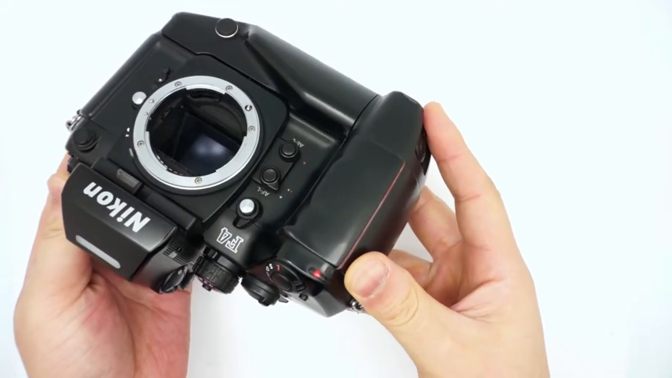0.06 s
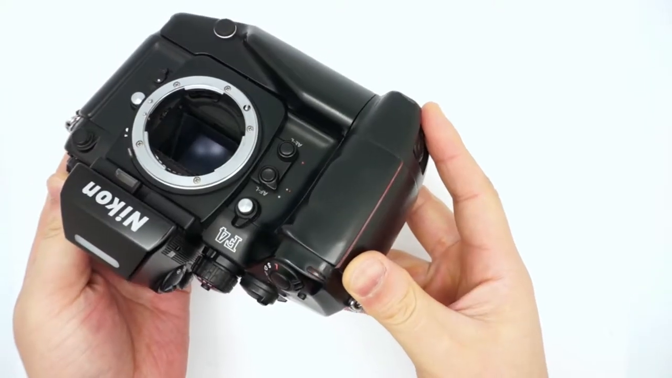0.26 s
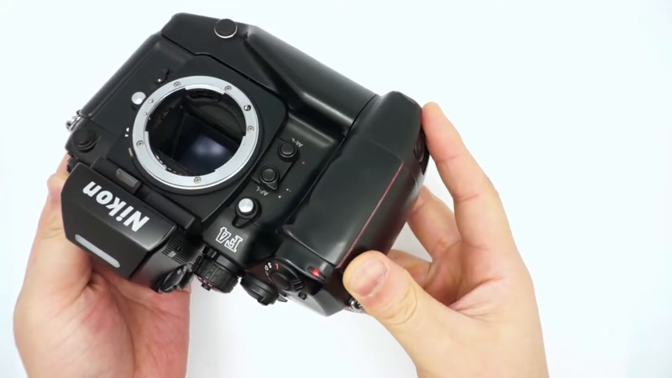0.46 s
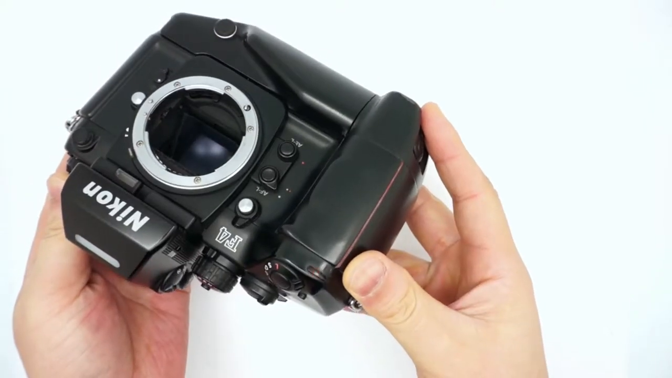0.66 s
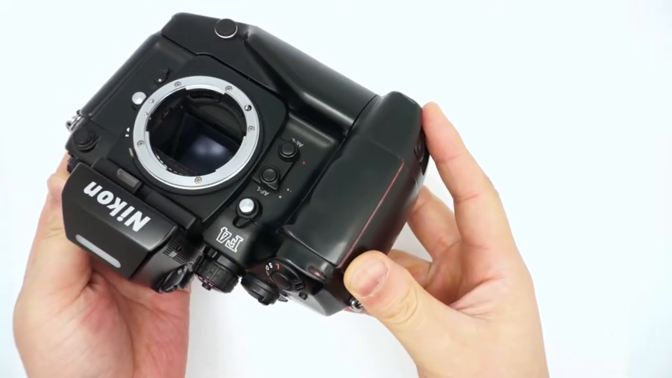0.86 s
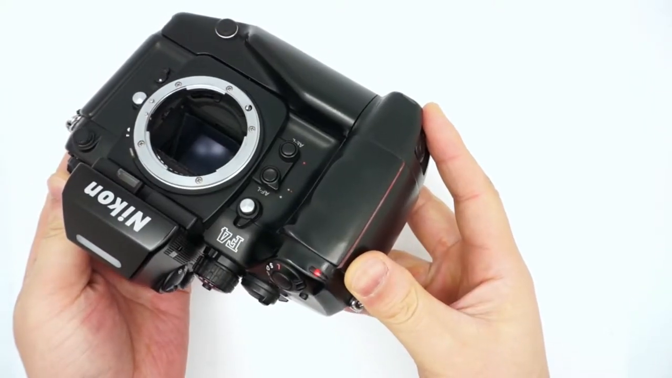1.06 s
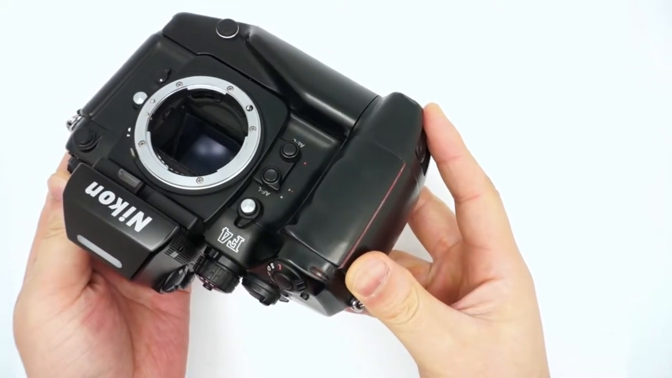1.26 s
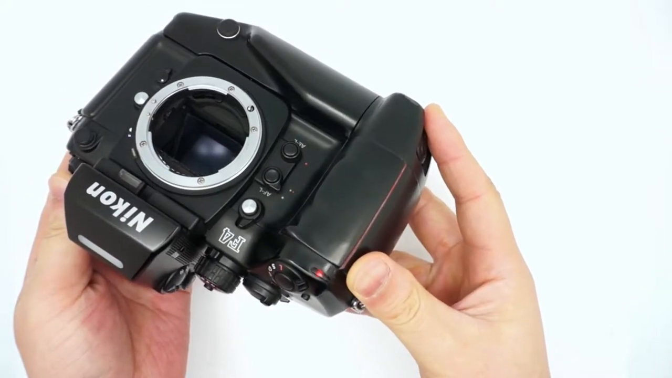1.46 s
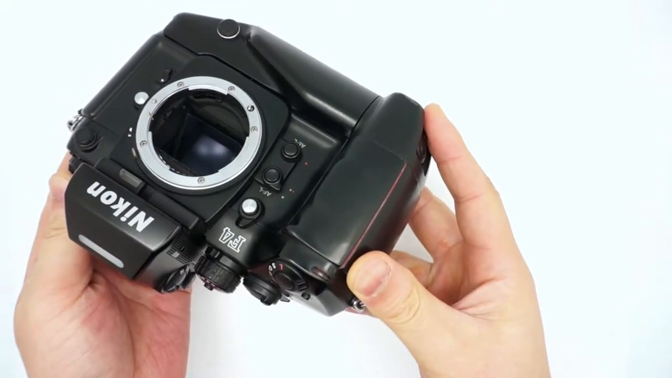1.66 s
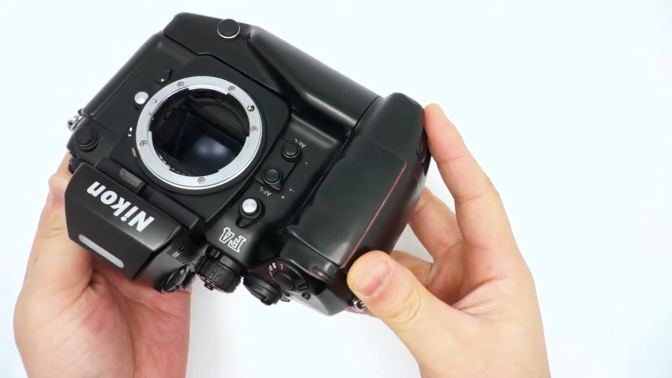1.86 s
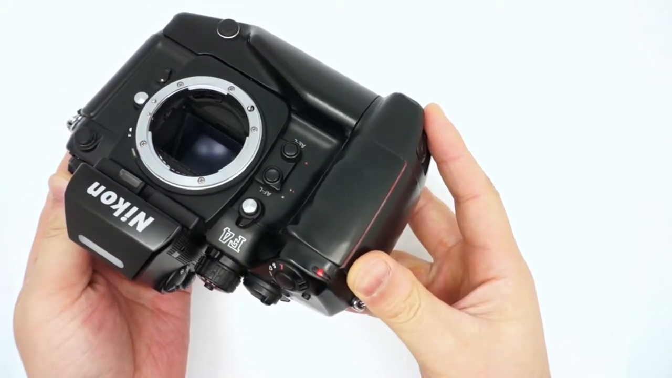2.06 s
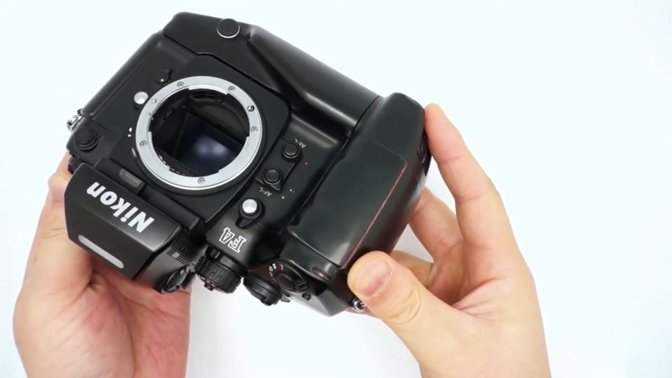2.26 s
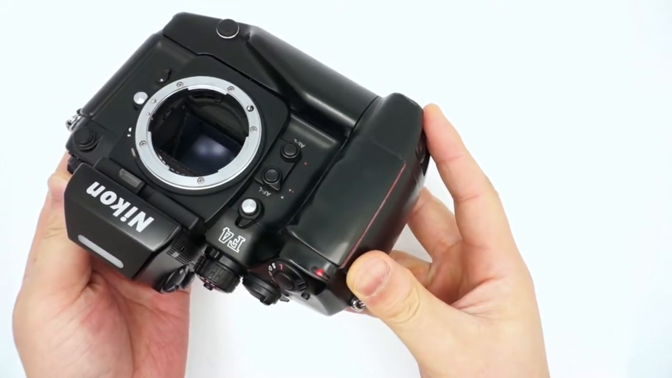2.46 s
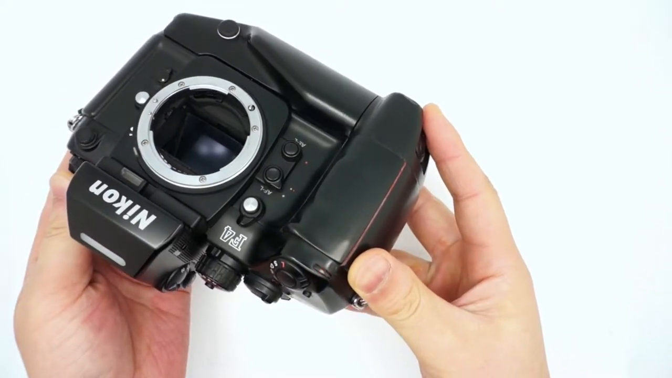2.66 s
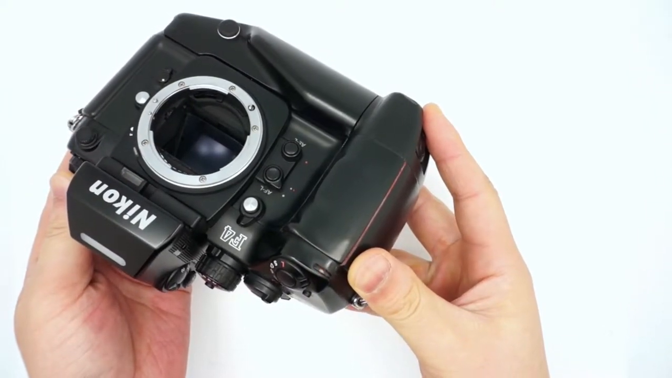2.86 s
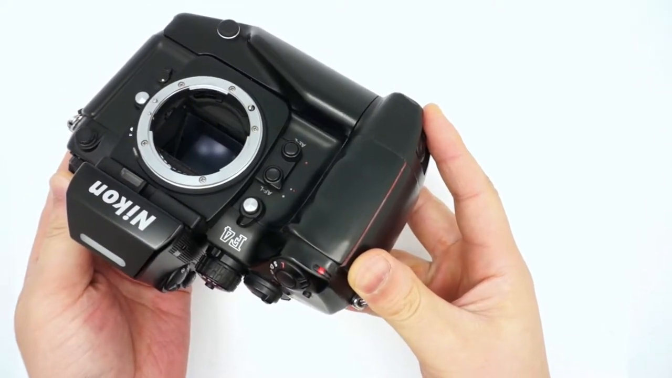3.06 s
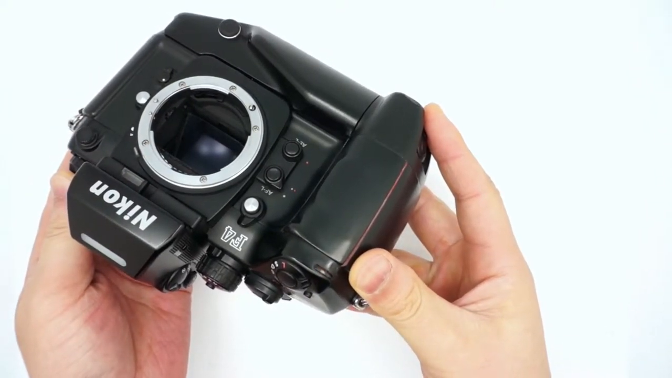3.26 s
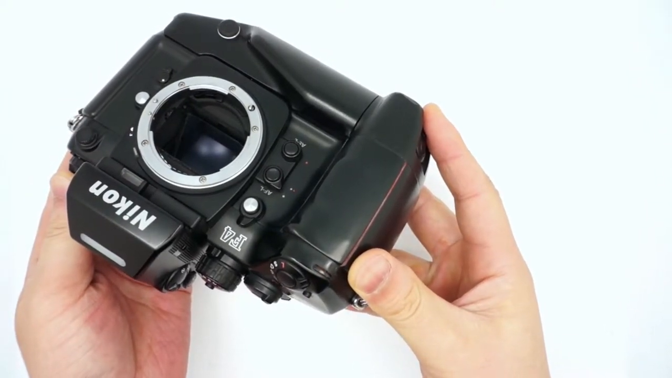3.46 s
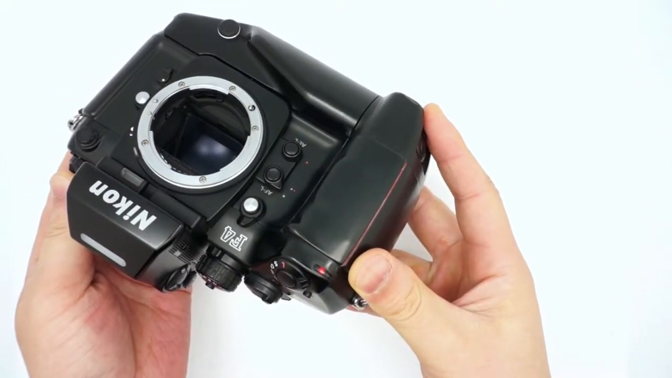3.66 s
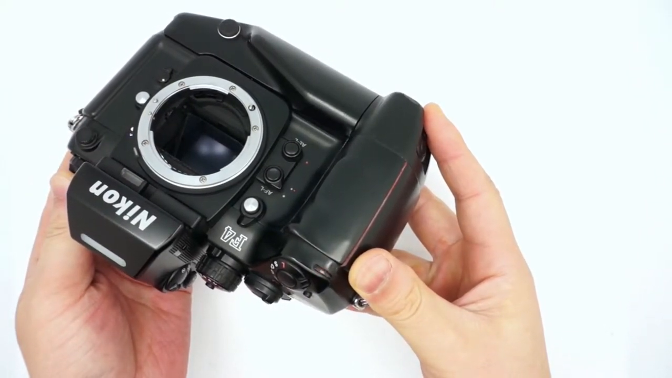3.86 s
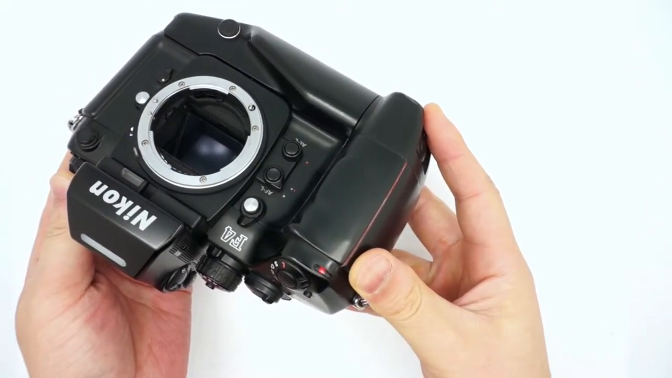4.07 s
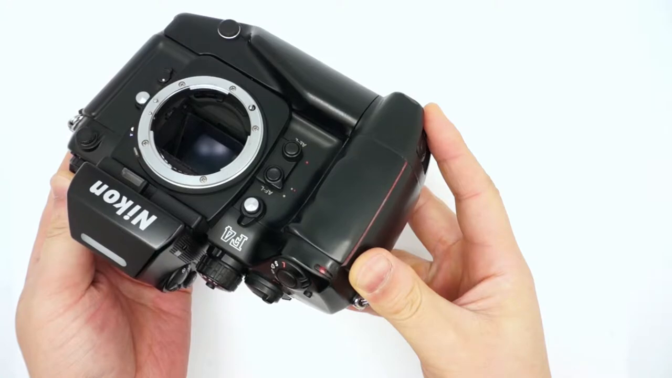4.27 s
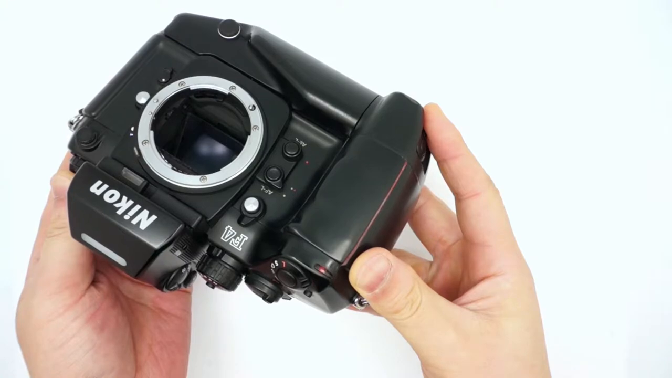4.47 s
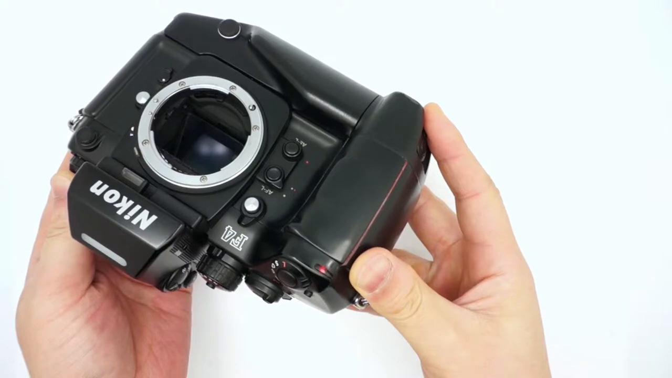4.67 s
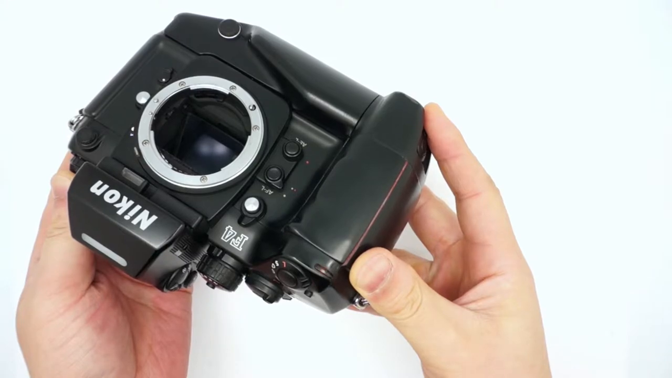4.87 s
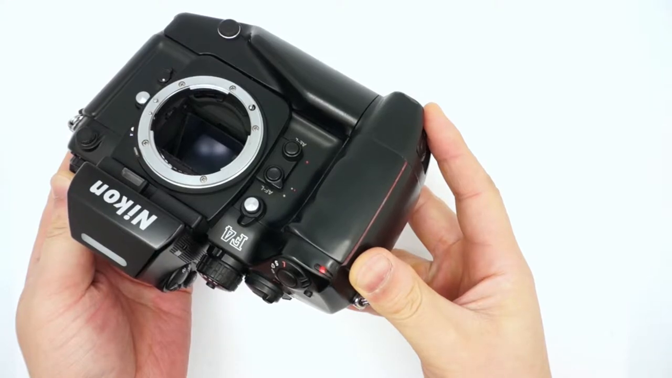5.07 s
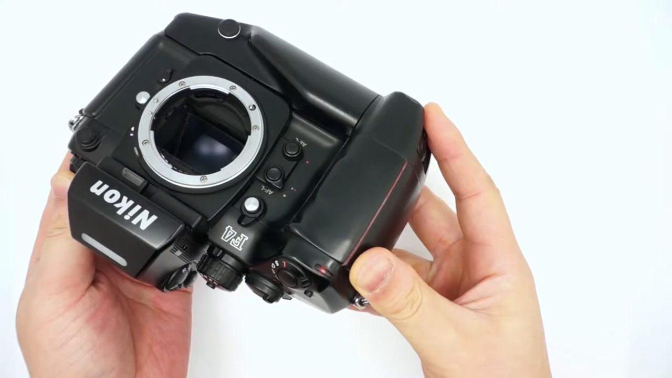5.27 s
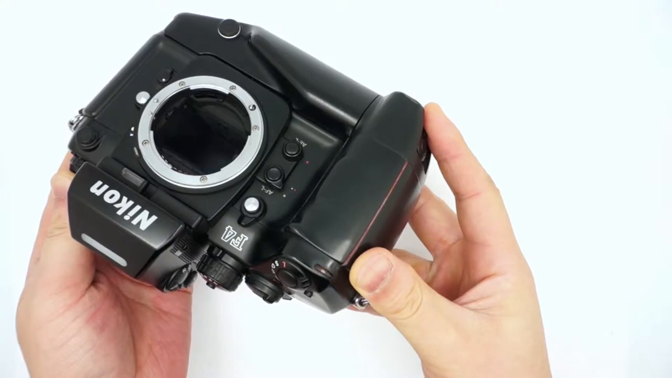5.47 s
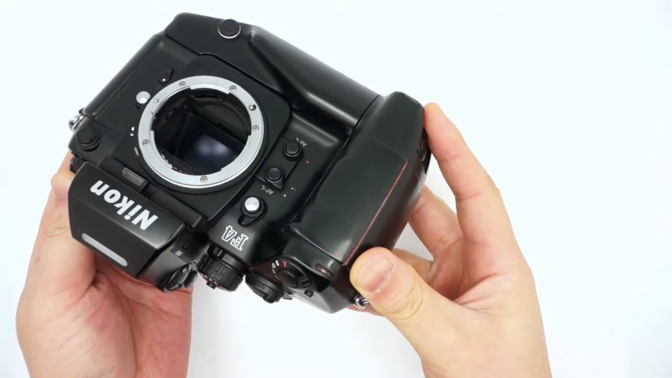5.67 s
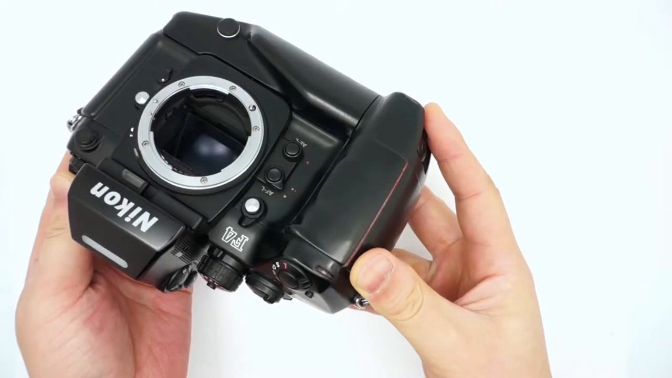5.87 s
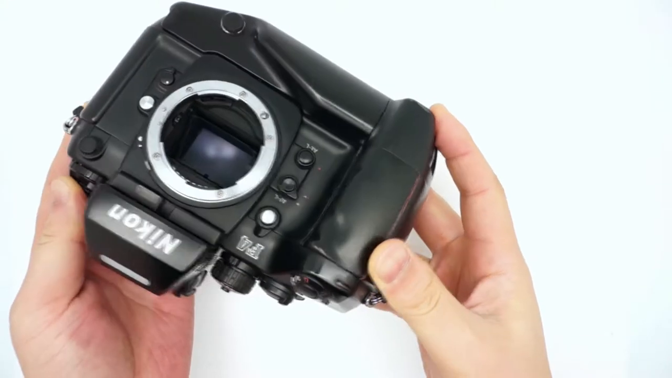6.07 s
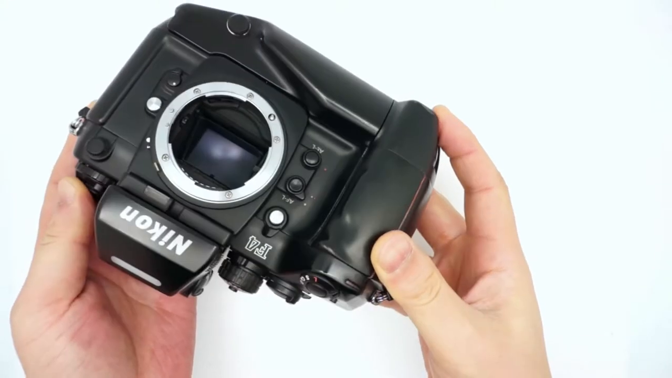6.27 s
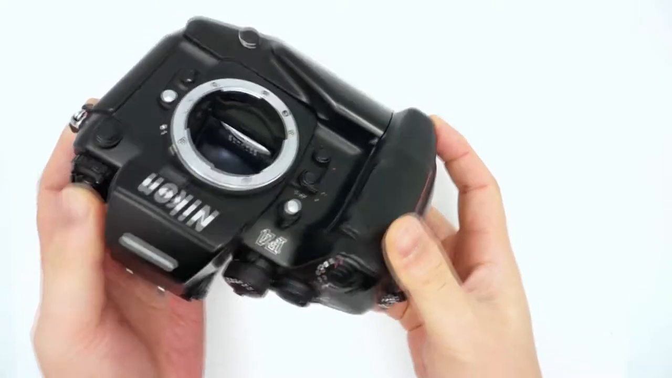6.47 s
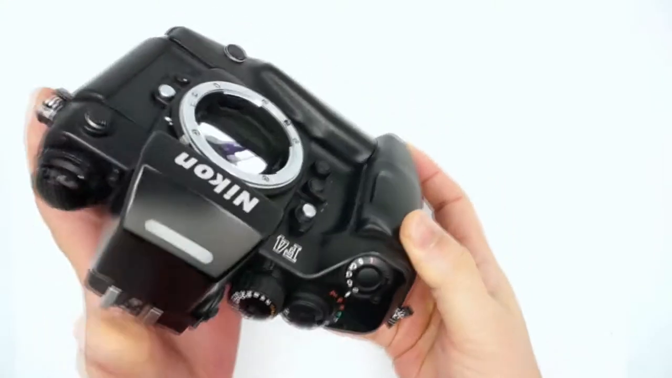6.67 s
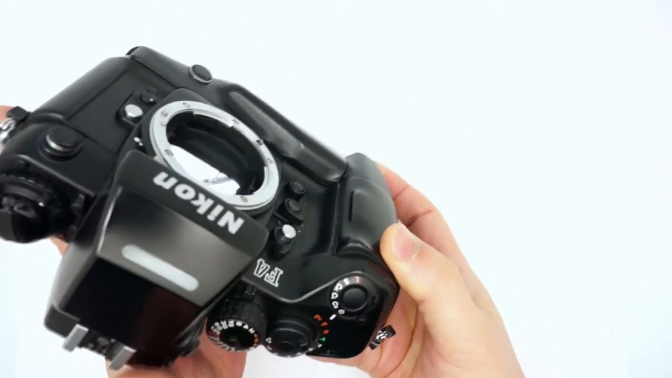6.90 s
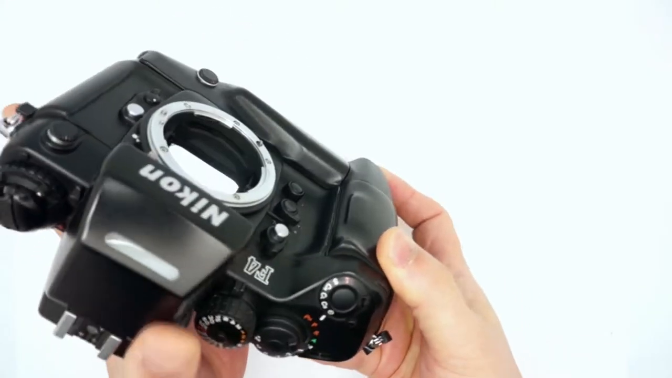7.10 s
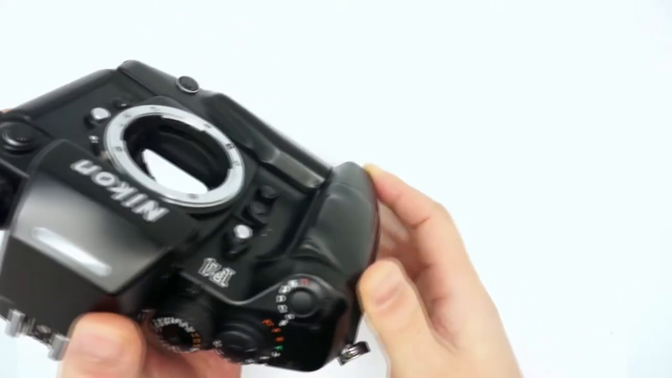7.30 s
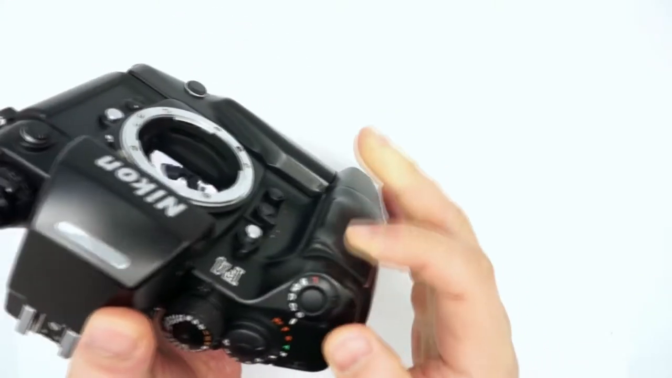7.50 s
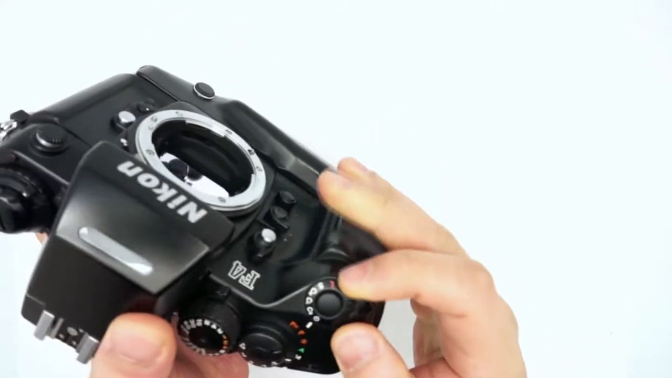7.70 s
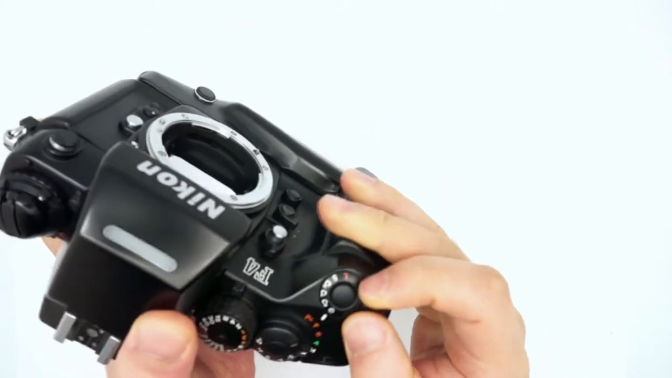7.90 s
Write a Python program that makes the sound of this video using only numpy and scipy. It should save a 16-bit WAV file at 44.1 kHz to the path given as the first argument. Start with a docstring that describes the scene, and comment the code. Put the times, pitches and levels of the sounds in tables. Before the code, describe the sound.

Over a steady fan hum, a film camera's shutter snaps once with a winding rasp, followed by finger taps and a table thump.

```python
"""A fan hums in a small room, and hands rustle faintly on a film camera held close to the microphone.
At 5.5 s the motor-driven camera fires once: mirror up, shutter, winding motor, mirror down.
Its levers strike their stops, its gears rasp, and the case and springs ring. Then the hands turn it
over, fingers tap, strap lugs click, and it is set down on a table with a thump. The fan runs
throughout; the recorder's gain control ducks at the loud blows and creeps back."""
import sys
import numpy as np
from scipy import signal
from scipy.fft import rfft, irfft, next_fast_len
from scipy.io import wavfile
from scipy.ndimage import uniform_filter1d, map_coordinates

SR = 44100
rng = np.random.default_rng(int(sys.argv[2]) if len(sys.argv) > 2 else 0)


def materialize(psi):
    """Save the field psi as 16-bit PCM at rate SR to the path in sys.argv[1].

    A 1-D psi becomes a single channel; in a 2-D psi each row is a channel.
    """
    bounded = np.clip(np.atleast_2d(psi).T, -1, 1)
    quanta = np.round(bounded * 32767).astype(np.int16)
    wavfile.write(sys.argv[1], SR, quanta)


N = 350154
TIME = np.arange(N) / SR
AGE = np.arange(SR) / SR  # seconds since a blow

# modes of the camera's hollow case: pitch_hz, level_db, t60_s
CASE_MODES = [(638, -4.5, 0.087), (730, -8, 0.084), (878, -33.5, 0.077), (1020, -12.5, 0.07),
              (1300, -14.5, 0.23), (1462, -12, 0.059), (1610, -3, 0.06), (1760, -9, 0.056)]
# modes of the metal works inside it: pitch_hz, level_db, t60_s
WORKS_MODES = [(2400, -10, .06), (2833, -8, .055), (3018, -7, .06), (5182, -13, .045), (6083, -13, .045),
               (6762, -14, .045), (9316, -16, .04)]


def shutter_release(catch_delay_s=0.0048, chatter_s=0.0026):
    """Mirror and shutter levers hit their stops in turn, each followed by its catch dropping in."""
    # start_s, click_db, corner_hz, ring_over_click_db, lever_hz, catch_over_lever_db, catch_hz
    levers = [(5.5163, 3.5, 19000, -2, 6530, -7, 5380), (5.552, -9, 9000, 4, 382, -7.5, 3460),
              (5.5703, 3, 12100, 1, 5310, 1, 7500), (5.5824, -0.5, 8600, 6, 4470, -10, 5160),
              (5.6170, -6.5, 7500, 4, 3050, -1.5, 2990), (5.6351, 6.5, 13100, 5, 6960, -3.5, 2950),
              (5.6572, 1, 8060, 3.5, 5780, -5, 3020), (5.6935, -5, 9500, -5, 1110, -8, 1130),
              (5.7040, 6, 9800, 0, 1197, 0.5, 1626)]
    modes = CASE_MODES + WORKS_MODES
    track = np.zeros(N)
    for start_s, lever_db, corner_hz, ring_db, lever_hz, catch_db, catch_hz in levers:
        case_db = -2.5 - 10 * np.log2(corner_hz / 9000)  # brighter clicks shake the case less
        lever = (start_s, lever_db, lever_hz)
        catch = (start_s + catch_delay_s, lever_db + catch_db, catch_hz)
        for s, db, hz in (lever, catch):
            t60 = 0.035 * np.exp(-0.14 * db)  # harder blows pin the part to its stop
            add(track, s, strike(modes, db, chatter_s, corner_hz, db + case_db, hz, db + ring_db, t60))
    return track


def strike(modes, click_db, rattle_s, corner_hz, case_db, part_hz, part_db, part_t60, looseness=0.0015):
    """A part hits its stop, chatters for a moment and rings; the case rings with it."""
    # spectrum of a metal click: frequency_hz, level_db
    steel = [(150, -24), (500, -8), (1500, -1), (2100, -4), (3000, -2), (5700, 1), (7600, -1), (9500, 0),
             (12000, -2), (15500, -4)]

    def fade(t60):
        return (1 - np.exp(-AGE / 0.00027)) * amp(-60 * np.maximum(AGE - rattle_s, 0) / t60)
    click = unit(noise(lambda hz: amp(along(steel, hz)) / np.hypot(1, (hz / corner_hz) ** 2), size=SR))
    # a dry crack, then the weaker shimmer of many small parts
    click *= np.hypot(fade(0.05), amp(-9) * fade(0.07))
    # a loose, quickly damped part has a blurred pitch
    drift = np.cumsum(rng.standard_normal(SR)) * np.sqrt(2 * np.pi * looseness * part_hz / part_t60 / SR)
    part = np.sqrt(2) * np.sin(2 * np.pi * part_hz * AGE + drift)
    case = ring(modes, attack_s=0.00042, scatter_db=4)
    return amp(click_db) * click + amp(part_db) * part * fade(part_t60) + amp(case_db) * case


def ring(modes, attack_s, scatter_db):
    """Damped modes, with new strengths and phases at every blow."""
    sound = np.zeros(SR)
    for hz, db, t60 in modes:
        decay = amp(db + scatter_db * rng.normal() - 60 * AGE / t60)
        sound += decay * np.sin(2 * np.pi * (hz * AGE + rng.random()))
    return sound * (1 - np.exp(-AGE / attack_s))


def mirror_springs(start_s=5.7045):
    """The falling mirror leaves its springs singing."""
    # modes of the springs: pitch_hz, level_db, t60_s
    spring_modes = [(1234, -17, .75), (1335, -28, 2.0), (1572, -12, .33), (2180, -26, .4), (2606, -28, .3),
                    (8113, -36, .3)]
    track = np.zeros(N)
    add(track, start_s, amp(1) * ring(spring_modes, attack_s=0.003, scatter_db=1))
    return track


def winding_motor(on_s=5.5135, off_s=5.708, spin_up_s=0.004, tooth_hz=370):
    """Gears rasp tooth by tooth through case and works, louder as the motor tensions the springs."""
    # spectrum of the rasp: frequency_hz, level_db
    gears = [(200, -26), (650, -4), (1600, -2), (2100, -3), (3000, 0), (4000, -1), (5800, 1), (9000, -3),
             (15500, -8)]
    load_db_per_s, brake_db_per_s = 47, 797

    def body(hz):
        modes = CASE_MODES + WORKS_MODES
        return 1 + sum(amp(db + 14) * peak(hz, centre, 35) ** 2 for centre, db, _ in modes)
    teeth_passed = np.cumsum(tooth_hz * (1 + 0.08 * wobble(40))) / SR
    teeth = unit(np.exp(0.44 * np.cos(2 * np.pi * teeth_passed)))
    running_s = np.clip(TIME, on_s, off_s) - on_s
    level_db = -10 + load_db_per_s * running_s - brake_db_per_s * np.maximum(TIME - off_s, 0)
    effort = amp(level_db) * (1 - np.exp(-running_s / spin_up_s))
    rasp = unit(noise(lambda hz: amp(along(gears, hz)) * body(hz)))
    return effort * teeth * rasp


def set_down():
    """The padded base thumps on the table top, and the camera clatters."""
    # modes of the table top: pitch_hz, relative_db, t60_s
    table_modes = [(84, -3, .13), (112, -1, .12), (175, -12, .06), (290, -9, .06), (377, -9, .09),
                   (720, -19, .05), (1109, -30, .07)]
    # edge, base, rattle, settling: start_s, click_db, rattle_s, corner_hz, ring_hz
    landing = [(7.4127, -18.5, 0.0041, 6700, 3910), (7.4195, -15, 0.0026, 3500, 655),
               (7.4300, -23.5, 0.017, 3570, 1110), (7.457, -28.5, 0.0027, 5000, 2420)]
    track = np.zeros(N)
    add(track, 7.414, amp(14) * ring(table_modes, attack_s=0.011, scatter_db=0.7))
    for s, db, rattle_s, corner_hz, hz in landing:
        add(track, s, strike(CASE_MODES, db, rattle_s, corner_hz, case_db=db,
                             part_hz=hz, part_db=db - 4, part_t60=0.063))
    return track


def finger_taps():
    """Fingers knock on the hollow case and its dials with a small click."""
    # start_s, click_db, knock_db, ring_hz
    taps = [(6.4819, -32.5, -30.5, 1560), (6.5258, -39, -21.5, 610), (6.5968, -33, -25, 610),
            (6.9370, -21, -14, 1030), (7.1634, -39, -39, 706), (7.2656, -35.5, -23.5, 684),
            (7.2880, -39, -33, 1600), (7.348, -40, -32, 680)]
    track = np.zeros(N)
    for s, click_db, knock_db, hz in taps:
        add(track, s, strike(CASE_MODES, click_db, rattle_s=0.003, corner_hz=9300, case_db=knock_db - 0.5,
                             part_hz=hz, part_db=knock_db - 1, part_t60=0.045))
    return track


def strap_lugs():
    """Light steel lugs click brightly and hardly move the case."""
    # start_s, click_db, ring_over_click_db, ring_hz
    clicks = [(6.7573, -20, -4, 6420), (6.8388, -20.5, -5, 4390)]
    track = np.zeros(N)
    for s, db, ring_db, hz in clicks:
        add(track, s, strike(CASE_MODES, db, rattle_s=0.0054, corner_hz=17000, case_db=db - 19,
                             part_hz=hz, part_db=db + ring_db, part_t60=0.06))
    return track


def hands():
    """Skin slides over the grip with a fine hiss, or shifts with a dull rustle."""
    # strokes along the grip: peak_s, half_length_s, level_db
    slides = [(2.608, 0.15, -33), (2.89, 0.13, -42.5), (6.135, 0.11, -33), (6.55, 0.087, -35),
              (6.845, 0.063, -34.5), (7.366, 0.085, -37.5), (7.94, 0.051, -40)]
    # spectrum of sliding skin: frequency_hz, level_db
    skin = [(300, -5), (1300, 11.5), (2200, 9), (5500, 7.5), (9000, 6.5), (15500, 6)]
    # rustles of the hands: peak_s, rise_s, level_db, centre_hz
    shifts = [(.265, 0.03, -40, 890), (2.27, 0.039, -40.5, 2100), (4.26, 0.02, -35.5, 750),
              (6.27, 0.022, -39, 900), (6.82, 0.025, -35, 3980)]

    def swell(s, rise_s, fall_s):
        return np.exp(-((TIME - s) / np.where(TIME < s, rise_s, fall_s)) ** 2)
    pressure = sum(amp(db) * swell(s, half_s, half_s) for s, half_s, db in slides)
    track = pressure * unit(noise(lambda hz: amp(along(skin, hz))))
    for s, rise_s, db, centre_hz in shifts:
        rustle = unit(noise(lambda hz: peak(hz, centre_hz, width_hz=1100) ** 2))
        track += amp(db) * swell(s, rise_s, fall_s=2.1 * rise_s) * rustle
    return track


def fan(blade_hz=193.9, hum_db=-20.5, sag_db_per_s=0.32):
    """Mid and side of a slowly fading blade tone in resonant air noise, over the microphone's hiss."""
    # rush of the air: frequency_hz, density_db
    rush = [(18, -54), (40, -52.5), (90, -49), (150, -43.5), (205, -56), (250, -51), (300, -64), (400, -61),
            (520, -72.5), (700, -72), (1100, -72.5), (1800, -83.5), (4000, -88), (15000, -115)]
    # resonances of fan and room: centre_hz, half_width_hz, density_db
    resonances = [(43.3, 2.9, -45), (61, 1.46, -39), (164.5, 9.8, -42), (382.2, 25.7, -54.5),
                  (631.6, 24, -66), (5460, 75, -80)]
    # the microphone's own noise: frequency_hz, density_db
    hiss = [(500, -83), (4000, -86), (13800, -84), (14900, -82.5), (15800, -80)]
    # stereo width of the noise: frequency_hz, side_over_mid_db
    spread = [(60, -30.5), (110, -39.5), (200, -16), (380, -10.5), (700, -5.5), (1290, -1.5), (2380, -4),
              (4400, -19.5), (8120, -79), (15000, -33)]

    def air(hz):
        boom_power = sum((amp(db) * peak(hz, centre, 2 * half) ** 2) ** 2
                         for centre, half, db in resonances)
        return np.sqrt(amp(along(rush, hz)) ** 2 + boom_power + amp(along(hiss, hz)) ** 2)
    tone = np.sqrt(2) * np.sin(2 * np.pi * blade_hz * TIME + 0.14 * wobble(1.6))
    hum = amp(hum_db - sag_db_per_s * TIME + 0.67 * wobble(4.02)) * tone
    # a narrow band of the rush swells once, at 1.6 s, and stays
    swell = (1 + np.tanh((TIME - 1.6) / 0.11)) / 2
    band = unit(noise(lambda hz: peak(hz, centre_hz=1380, width_hz=260) ** 2))
    drone = amp(-50 + 4 * swell + 2 * wobble(28)) * band
    side = noise(lambda hz: air(hz) * amp(along(spread, hz)))
    return np.array([noise(air) + drone + hum, side])


def room(x):
    """A small room's reverberation; each frequency dies at its own speed."""
    # frequency_hz, t60_s
    decay_times = [(150, 0.44), (1500, 0.26), (6000, 0.19), (14000, 0.24)]
    hz, t, spectrum = signal.stft(rng.standard_normal(SR // 2), SR, nperseg=256)
    decay = amp(-60 * t / along(decay_times, hz)[:, None])
    tail = signal.istft(spectrum * decay, SR, nperseg=256)[1]
    return signal.fftconvolve(x, tail / np.linalg.norm(tail))[:N]


def camera_width(x, delay_s=0.0022):
    """A slightly delayed, filtered copy in the side channel widens the clicks, mostly in the midrange."""
    # frequency_hz, side_db
    colour = [(100, -15), (400, -21), (1200, -13), (2400, -7), (4400, -11.5), (8000, -38), (15000, -26)]
    return filtered(x, lambda hz: amp(along(colour, hz)) * np.exp(-2j * np.pi * hz * delay_s))


def amp(db):
    """Decibels to gain."""
    return 10 ** (np.asarray(db) / 20)


def unit(x):
    """Scaled to rms 1."""
    return x / np.sqrt(np.mean(x ** 2) + 1e-20)


def along(points, hz):
    """(frequency_hz, value) points read on a log axis."""
    frequencies, values = np.transpose(points)
    return np.interp(np.log(hz + 1), np.log(frequencies + 1), values)


def wobble(rate):
    """A smooth random curve, rate knots a second."""
    return map_coordinates(rng.standard_normal(int(N * rate / SR) + 4), [TIME * rate])


def filtered(x, response):
    """x through a frequency response."""
    n = x.shape[-1]
    padded = next_fast_len(n + SR // 4)
    return irfft(rfft(x, padded) * response(np.fft.rfftfreq(padded, 1 / SR)), padded)[..., :n]


def noise(response, size=N):
    """Noise whose amplitude per root Hz is the response."""
    return filtered(rng.standard_normal(size), response) * np.sqrt(SR / 2)


def peak(hz, centre_hz, width_hz):
    """Gain of one resonance."""
    return hz * width_hz / np.hypot(centre_hz ** 2 - hz ** 2, hz * width_hz)


def add(track, s, sound):
    """Mix a sound in at time s."""
    part = track[round(s * SR):][:len(sound)]
    part += sound[:len(part)]


def scene(room_db=-18):
    """The camera is close and centred on the microphone, with a little stereo width, over the fan."""
    camera = shutter_release() + mirror_springs() + winding_motor()
    camera += finger_taps() + strap_lugs() + set_down()
    centre = camera + amp(room_db) * room(camera) + hands()
    mid, side = np.array([centre, camera_width(camera)]) + fan()
    return np.array([mid + side, mid - side])


def record(dry, threshold_db=-9.3, recovery_per_s=0.61, ceiling=0.88, top_hz=15850):
    """Gain control drops at once and climbs back steadily; peaks are rounded and the band is limited."""
    sensed = filtered(dry, lambda hz: hz / np.hypot(hz, 230))  # bass hardly moves the gain
    power = uniform_filter1d(np.mean(sensed ** 2, axis=0), size=130)
    level = np.sqrt(np.abs(power) + 1e-12)
    needed = np.minimum(1, amp(threshold_db) / level)
    climb = recovery_per_s * TIME
    gain = np.minimum.accumulate(needed - climb) + climb
    ducked = dry * uniform_filter1d(gain, size=40)
    rounded = ducked / (1 + np.abs(ducked / ceiling) ** 6) ** (1 / 6)
    return filtered(rounded, lambda hz: hz < top_hz)


dry = scene()
out = record(dry)
materialize(out)
```